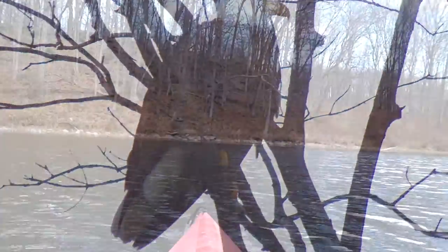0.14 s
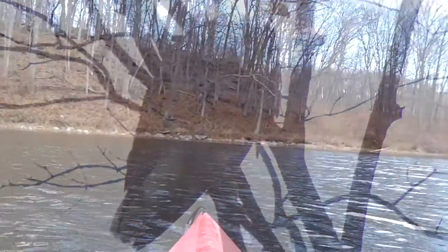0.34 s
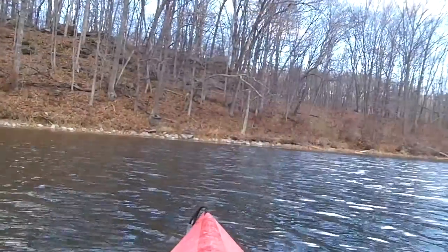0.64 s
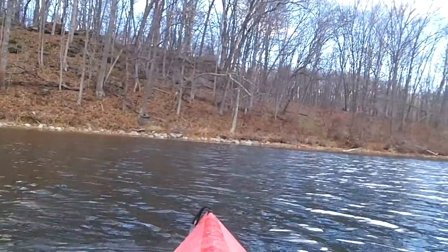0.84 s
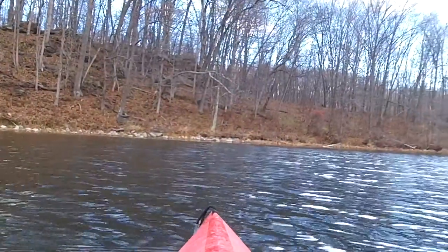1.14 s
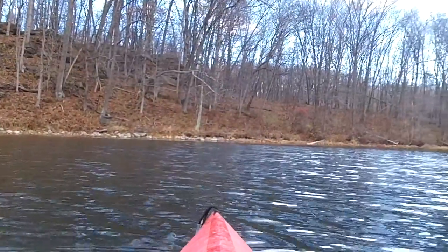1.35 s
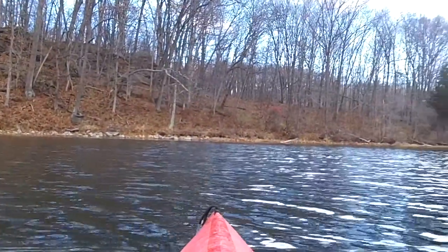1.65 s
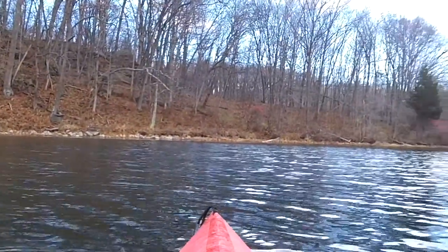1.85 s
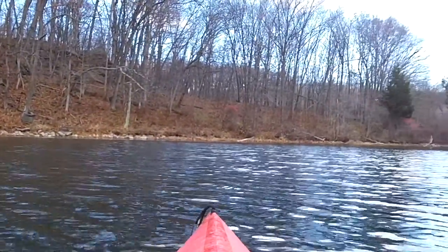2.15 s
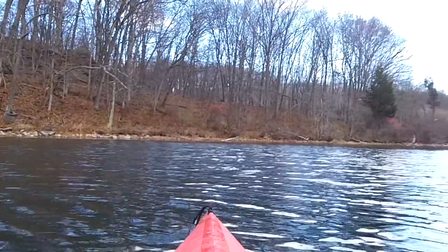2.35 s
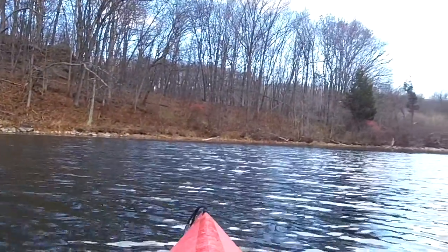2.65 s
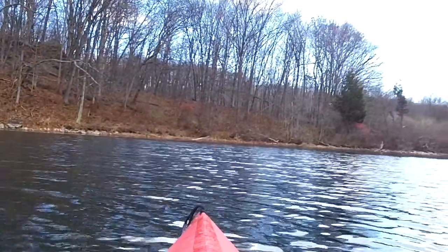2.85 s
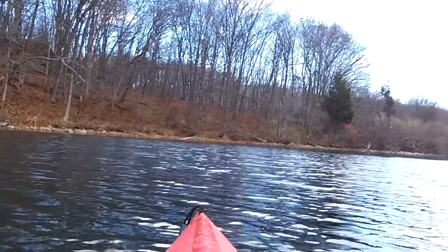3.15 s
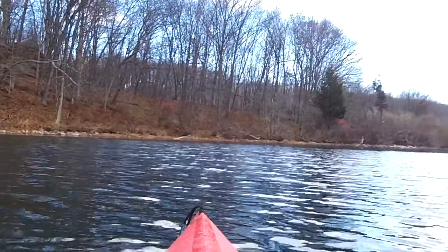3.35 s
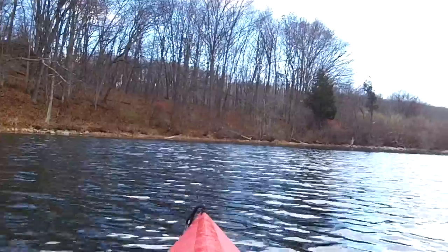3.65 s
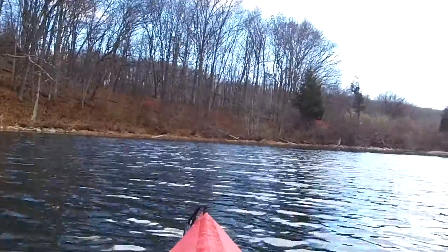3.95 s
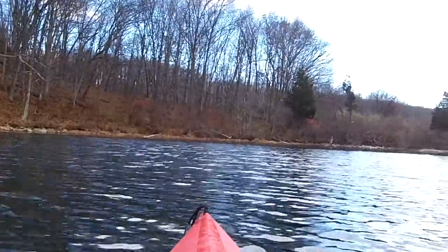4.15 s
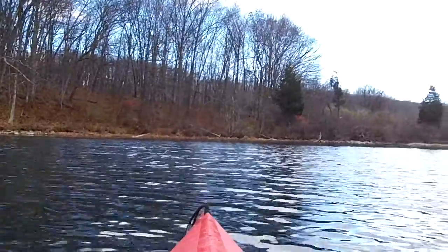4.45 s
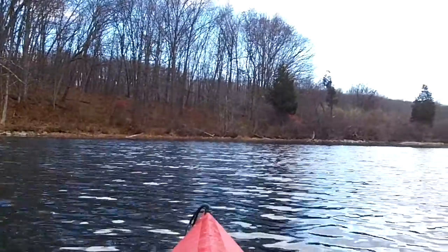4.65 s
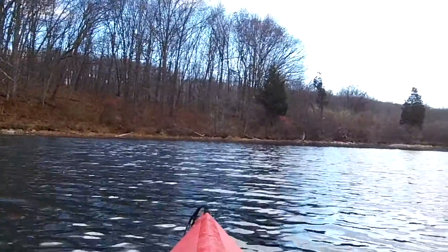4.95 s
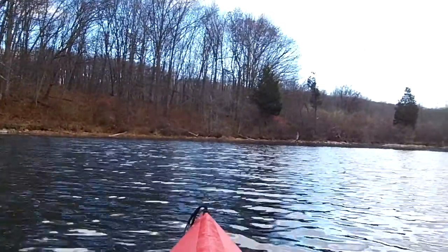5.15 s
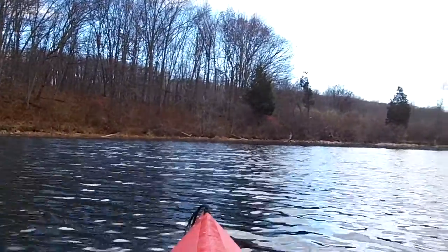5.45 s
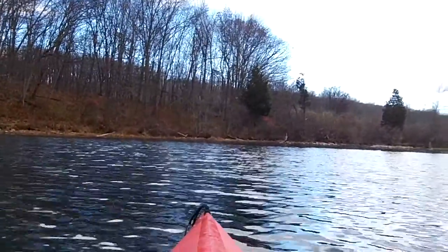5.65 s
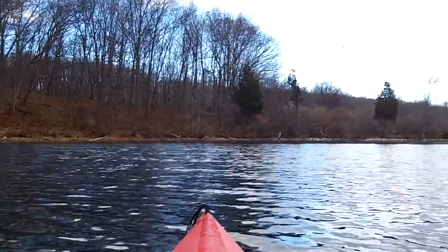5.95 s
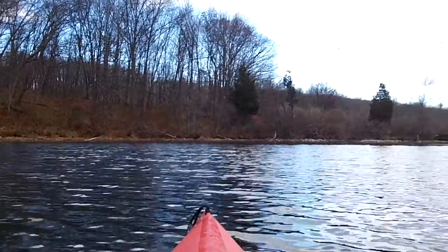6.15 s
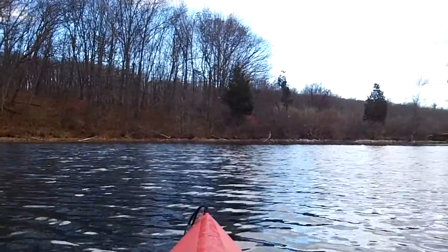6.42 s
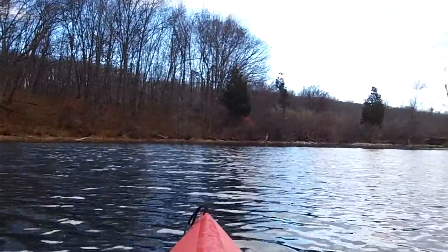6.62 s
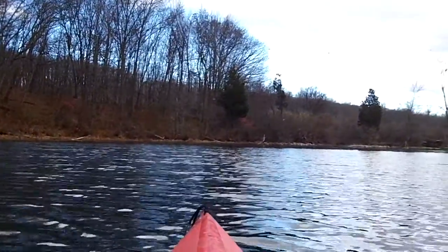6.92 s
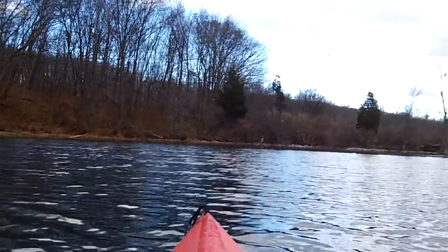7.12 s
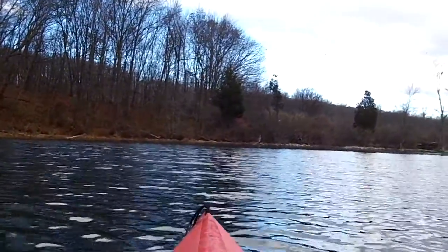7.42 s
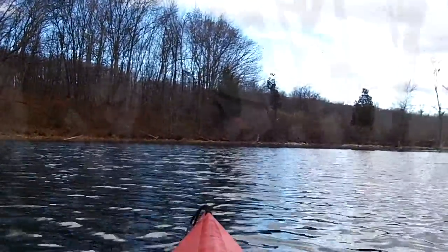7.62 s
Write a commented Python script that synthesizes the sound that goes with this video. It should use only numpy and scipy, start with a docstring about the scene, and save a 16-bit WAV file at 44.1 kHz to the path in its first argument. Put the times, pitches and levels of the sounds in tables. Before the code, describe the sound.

Close water splashes and gurgles at a small boat, then an eagle gives four rough-to-clear rising chirps across a lake, with faint peeps behind.

```python
"""An eagle on a wooded shore gives four two-part calls across a lake: a rough low voice leaps to a clean high one,
both built from partials weighted by the throat, and the bare trees send back a thin echo of filtered noise.
A fainter bird peeps far off in arched sine whistles; water splashes, gurgles and drips at a small boat as ringing
bubbles; wind touches the microphone as low noise and a hull boom, over a far rush of coloured noise."""
import sys
import numpy as np
from scipy import signal
from scipy.fft import rfft, irfft, next_fast_len
from scipy.io import wavfile

SR = 44100
rng = np.random.default_rng(int(sys.argv[2]) if len(sys.argv) > 2 else 0)


def volts_from_db(level):
    """Convert decibel levels to linear amplitude ratios."""
    exponent = np.asarray(level, float) / 20
    return 10 ** exponent


def transcribe(signal):
    """Save signal, clipped to [-1, 1], as a 16-bit WAV file at the path in sys.argv[1]."""
    frames = np.atleast_2d(signal).T
    limited = np.clip(frames, -1, 1)
    pcm = np.round(limited * 32767).astype(np.int16)
    wavfile.write(sys.argv[1], SR, pcm)


N = 343098

# water bubbling at the hull: t/s, level/dB
HULL_WATER = [(0, -87.5), (.28, -59), (.6, -57.5), (.68, -47), (.87, -41.5), (1.14, -44), (1.24, -53.5),
              (1.85, -60), (2.05, -51.5), (2.18, -60.5), (2.35, -52), (2.8, -61), (3.7, -65), (3.8, -50),
              (4.0, -65), (4.15, -54), (4.4, -56.5), (4.8, -64.5), (5.6, -70.5), (5.72, -57.5),
              (5.85, -71.5), (7.78, -83)]


def rms_one(x):
    """Normalisation: scales a signal to unit root-mean-square."""
    return x / np.sqrt(np.mean(x ** 2) + 1e-20)


def in_time(rows):
    """Linear interpolation: the columns of a curve table, one value a sample."""
    s, *columns = np.transpose(rows)
    return [np.interp(np.arange(N) / SR, s, c) for c in columns]


def band(x, low_hz, high_hz, order=2):
    """Band limitation by a Butterworth band-pass."""
    return signal.sosfilt(signal.butter(order, [low_hz, high_hz], "band", fs=SR, output="sos"), x)


def drift(rate_hz):
    """Slow random fluctuation of spread 1: white noise through a double-pole low-pass."""
    r = np.exp(-32 * np.pi * rate_hz / SR)   # drawn at every 16th sample
    noise = rng.standard_normal(N // 16 + 2002)
    slow = signal.lfilter([1], [1, -2 * r, r * r], noise)[2000:]
    return np.interp(np.arange(N) / 16, np.arange(len(slow)), rms_one(slow))


def air():
    """Broadband noise shaped by its spectrum: the far rush of water and of wind in trees."""
    # spectral colour of the rush: f/Hz, relative level per Hz/dB
    colour_points = np.array([(18, -18.5), (30, -1.5), (258, -6), (311, -6), (518, -7.5), (862, -6),
                              (1890, -10), (2330, -14), (2740, -15), (6460, -21), (7600, -8.5), (9880, -54),
                              (16700, -120)])
    # strength of the rush: t/s, level/dB
    rush = [(0, -55.5), (.5, -56), (2.0, -57), (3.3, -57.5), (4.8, -56.5), (6.05, -57.5), (6.3, -54.5),
            (6.6, -57), (7.78, -58)]
    size = next_fast_len(N)
    hz = np.fft.rfftfreq(size, 1 / SR) + 1   # kept above zero for the logarithm
    colour = volts_from_db(np.interp(np.log(hz), np.log(colour_points[:, 0]), colour_points[:, 1]))
    noise = irfft(rfft(rng.standard_normal(size)) * colour, size)[:N]
    return volts_from_db(in_time(rush)[0]) * rms_one(noise)


def wind():
    """Turbulent pressure on the microphone port, and cavity resonance of the hollow hull."""
    # gusts: centre t/s, half length/s, buffeting level/dB, hull boom level/dB
    gusts = [(0.403, 0.043, -62, -56), (0.573, 0.13, -57, -57.5), (1.105, 0.22, -63, -68),
             (3.935, .15, -75, -68.5), (4.78, 0.11, -78, -62), (5.044, 0.068, -54, -49.5),
             (5.134, 0.11, -71, -51), (5.43, 0.087, -61.5, -70), (5.851, 0.073, -66, -64)]
    buffet_db, boom_db = -70, -79.5   # between gusts
    lumpy_db, lumps_hz = 3, 5         # slow swing of these two levels
    now = np.arange(N) / SR
    buffet_gain = volts_from_db(buffet_db + lumpy_db * drift(lumps_hz))
    boom_gain = volts_from_db(boom_db + lumpy_db * drift(lumps_hz))
    for s, half_s, gust_buffet_db, gust_boom_db in gusts:
        swell = np.exp(-((now - s) / half_s) ** 2)
        buffet_gain = buffet_gain + volts_from_db(gust_buffet_db) * swell
        boom_gain = boom_gain + volts_from_db(gust_boom_db) * swell
    buffet = rms_one(band(rng.standard_normal(N), 18, 70, order=1))
    boom_phase = 2 * np.pi * np.cumsum(61.0 + 5.0 * drift(8)) / SR
    boom = np.sin(boom_phase) * volts_from_db(2.5 * drift(15))
    return buffet_gain * buffet + boom_gain * rms_one(boom)


def bubble(hz, t60, rise):
    """Resonance of trapped air: a faint tick of impact, then a decaying ring gliding by rise octaves per s."""
    t = np.arange(round(min(t60, .15, 1 / (abs(rise) + 1)) * SR) + 8) / SR
    ring = np.sin(2 * np.pi * np.cumsum(hz * 2 ** (rise * t)) / SR)
    swell = 1 - np.exp(-t / 0.00031)
    ending = np.clip((t[-1] - t) * 300, 0, 1)
    tick = 0.063 * np.exp(-t / 0.0016) * np.cos(2 * np.pi * 1.774 * hz * t)
    return ring * volts_from_db(-60 * t / t60) * swell * ending + tick


def wash():
    """Superposition of many small bubbles around one size, in clumps; louder water is also denser."""
    level_db = in_time(HULL_WATER)[0]
    per_s = 1600 * volts_from_db(.4 * (level_db + 45))   # before clumping
    draws, sizes, out = rng.random((N, 3)), rng.standard_normal(N), np.zeros(N + SR)
    for i in np.flatnonzero(draws[:, 0] < per_s * volts_from_db(4 * drift(20)) / SR):
        hz = np.clip(1700 * 2 ** (.62 * sizes[i]), 450, 6500)
        b = bubble(hz, (8 + 30 * draws[i, 1] ** 3) / hz, 40 * (draws[i, 1] - .3))
        # few are strong, and high ones are slightly weaker
        strength_db = -3.5 * np.log(draws[i, 2] + 0.0044) - 0.69 * np.log2(hz / 1000)
        out[i:i + len(b)] += b * volts_from_db(strength_db)
    return volts_from_db(level_db) * rms_one(out[:N] / np.sqrt(per_s))


def sprinkle():
    """Random arrivals of small stray drops of many sizes, more frequent while the water is stirred."""
    per_s, level_db = 51, -42.5     # at a hull water level of -50 dB
    middle_hz, spread_octaves = 2320, 0.81
    draws, sizes, out = rng.random((N, 2)), rng.standard_normal((N, 2)), np.zeros(N + SR)
    stirred_db = in_time(HULL_WATER)[0] + 50
    for i in np.flatnonzero(draws[:, 0] < per_s * volts_from_db(1.3 * stirred_db) / SR):
        hz = np.clip(middle_hz * 2 ** (spread_octaves * sizes[i, 0]), 400, 6800)
        b = bubble(hz, (12 + 25 * draws[i, 1] ** 2) / hz, 9.4 * sizes[i, 1])
        # stronger drops also glide upward faster
        out[i:i + len(b)] += volts_from_db(level_db + 0.21 * stirred_db[i] + 2.7 * sizes[i, 1]) * b
    return out[:N]


def drops():
    """Resonance of single drops and bubbles that stand out, each throwing four smaller ones after it."""
    # single drops: t/s, peak level/dB, f/Hz, t60/s (at least .004 is used), pitch rise/(octaves per s)
    single_drops = [(.031, -44, 5500, .01, 0), (.094, -47, 6000, .006, 0), (.209, -47, 5500, .005, 0),
                    (.288, -47, 6120, .006, 0), (.174, -45.5, 4160, 0.0088, 20),
                    (.268, -39, 4270, 0.0032, 0), (0.289, -38.5, 1350, 0.048, 6),
                    (.334, -42.5, 2770, .019, 7), (0.545, -32.5, 4000, 0.0056, 0),
                    (.544, -42, 5600, .016, 10), (0.562, -36, 4500, 0.0036, 0),
                    (.563, -25.5, 7050, .005, 0), (.653, -44, 2540, .015, 3),
                    (.676, -36.5, 1040, 0.046, -26), (.705, -32, 1160, 0.046, -2),
                    (.725, -29, 904, 0.024, 0), (.73, -30.5, 1750, .013, 4), (0.763, -34, 775, .016, 0),
                    (.762, -24.5, 2600, 0.011, 0), (0.763, -36, 3600, .0097, 0), (.793, -45, 5870, .007, 0),
                    (.812, -39, 1202, 0.19, -11), (.912, -46, 6160, .006, 0),
                    (.968, -42.5, 4550, 0.0076, 0), (1.061, -39, 4300, .004, 0), (1.096, -38, 2500, .02, 2),
                    (1.11, -37.5, 1600, .039, -1), (1.129, -49, 6060, .006, 0),
                    (1.195, -44, 1050, .058, -6), (3.474, -47, 4500, .008, 0), (4.245, -40, 4505, .004, -2),
                    (0.778, -35, 1490, .021, -6), (.844, -26, 1320, 0.018, -3),
                    (0.851, -30, 2020, 0.025, 1), (.86, -24, 1400, 0.0063, -11),
                    (0.866, -28.5, 2410, 0.03, 0), (.915, -30.5, 2650, 0.015, -1),
                    (0.929, -19, 1310, 0.0076, 12), (.951, -27, 1750, .017, 0),
                    (0.967, -36, 1380, 0.024, -4), (.998, -36, 2270, 0.066, -4.5),
                    (1.014, -19, 1770, .013, -12), (1.052, -32, 2420, 0.012, 0),
                    (1.062, -34, 1640, .0087, 0), (1.13, -35.5, 3440, 0.0049, 0),
                    (1.146, -39, 996, 0.091, -2), (1.17, -33.5, 2360, .029, -6),
                    (1.247, -34.5, 1100, 0.035, 2), (1.29, -43, 1185, 0.088, -18.5),
                    (1.395, -39, 778, 0.092, -25), (1.42, -44.5, 740, 0.28, .6),
                    (1.428, -34.5, 2560, 0.0069, 2), (1.455, -30, 1500, 0.0041, -2),
                    (1.517, -36.5, 1590, 0.015, 0), (1.552, -34.5, 2320, 0.021, 9),
                    (1.691, -37, 1500, .039, 0.5), (1.753, -40, 1120, 0.028, 6),
                    (1.873, -42.5, 550, 0.029, 37), (1.904, -40, 2100, 0.014, 2),
                    (1.925, -31.5, 1140, 0.019, -11), (1.994, -30.5, 1500, 0.0051, 2),
                    (2.017, -42, 864, 0.078, 47), (2.063, -39.5, 1170, 0.022, 9),
                    (2.264, -40.5, 2630, 0.0045, -2), (2.306, -39, 1460, .017, 0),
                    (2.342, -33, 2000, 0.011, 11), (2.342, -41.5, 3740, 0.014, 29),
                    (2.35, -40, 1210, 0.034, -17), (2.405, -37.5, 1284, 0.031, 3),
                    (2.408, -38.5, 2460, .044, -39), (2.474, -41.5, 1735, .086, 8),
                    (2.495, -37, 2230, .019, -4), (2.51, -31.5, 1800, 0.022, -18),
                    (3.487, -34, 1960, 0.01, -10), (3.776, -27.5, 2310, 0.0078, -6),
                    (3.778, -35.5, 1230, .031, -29), (3.792, -33.5, 987, 0.054, 2),
                    (3.984, -45, 997, .069, 17), (4.023, -33.5, 1796, 0.0078, 0),
                    (4.023, -33.5, 2760, 0.016, 10), (4.091, -23, 2000, .024, 5),
                    (4.126, -35.5, 1117, 0.029, 38), (4.156, -27, 1390, 0.014, -6),
                    (4.178, -38, 2190, 0.015, -13), (4.228, -36, 3130, .0092, 0),
                    (4.238, -34.5, 2290, 0.0093, 4), (4.267, -33, 2500, 0.013, -6),
                    (4.303, -29, 891, .077, 5.5), (4.64, -39, 2950, 0.0034, 0),
                    (4.692, -25, 1846, 0.039, -12), (4.823, -37.5, 916, 0.066, 47),
                    (5.224, -43.5, 1111, 0.072, -3), (5.7, -46, 482, .039, -5), (5.684, -43.5, 393, .01, 0),
                    (5.761, -46, 200, .026, 6), (5.762, -34, 1723, 0.0039, -2),
                    (5.761, -34.5, 580, 0.01, -15), (6.001, -48.5, 3700, .012, -16),
                    (7.194, -46.5, 2385, 0.042, -1)]
    out, spray = np.zeros(N + SR), rng.standard_normal((len(single_drops), 4, 3))
    for (s, db, hz, t60, rise), around in zip(single_drops, spray):
        b, i = bubble(hz, max(t60, .004), rise), round(s * SR)
        out[i:i + len(b)] += volts_from_db(db) * b / np.max(np.abs(b))
        for late, size, strength in around:
            b = bubble(hz * 2 ** (0.21 + 0.483 * size), 22.7 / hz, 20.0)
            j = i + round(0.0088 * abs(late) * SR)
            out[j:j + len(b)] += volts_from_db(db - 13 + 4.0 * strength) * b
    return out[:N]


def far_bird():
    """Frequency modulation: each whistle arches up to its top and down, wavering over the distance."""
    # arched whistles: t/s at the top, top f/Hz, level/dB
    peeps = [(0.374, 1632, -48), (1.405, 1640, -48.5), (1.818, 1600, -46), (2.256, 1582, -46),
             (2.634, 1580, -50.5), (3.449, 1590, -52), (3.92, 1607, -49.5)]
    out, u = np.zeros(N), np.linspace(-1, 1, round(.076 * SR))
    for s, hz, db in peeps:
        i = round(s * SR) - len(u) // 2
        phase = np.cumsum(hz * (1 - 0.24 * u ** 2)) * 2 * np.pi / SR
        out[i:i + len(u)] += volts_from_db(db) * np.sqrt(2) * (1 - u ** 4) * np.sin(phase)
    return out * volts_from_db(2.5 * drift(40))


def shore(x):
    """Scattering off many trunks: a dense tail of echoes whose treble dies first."""
    t60_s, treble_t60_s, level_db = 1.39, 0.85, -23.5
    t, scatter = np.arange(SR) / SR, rng.standard_normal(SR)
    tail = band(scatter, 1080, 4120) * volts_from_db(-60 * t / t60_s)
    tail += 0.72 * band(scatter, 4040, 4800) * volts_from_db(-60 * t / treble_t60_s)
    tail *= np.clip(t / 0.02, 0, 1)
    return volts_from_db(level_db) * signal.oaconvolve(x, tail / np.sqrt(np.sum(tail ** 2)))[:N]


def throat(hz):
    """Resonant filtering: gain of throat and beak at a frequency."""
    # throat and beak: f/Hz, level/dB
    points = np.array([(600, -20), (1250, -18), (1400, -12.5), (1600, -2), (2000, -0.5), (2500, -3.5),
                       (2780, 0.5), (2950, -4.5), (3090, -14), (3250, 1), (3900, -9), (4200, -2),
                       (4800, -5), (5500, -8.5), (6200, -12), (7500, -18.5)])
    return volts_from_db(np.interp(np.log(hz), np.log(points[:, 0]), points[:, 1]))


def voice(calls, partials_db):
    """Source and filter: pitch, phase, effort and throat-coloured partial heights of one side of the syrinx."""
    hz, effort_db, bright_db = in_time(np.concatenate(calls))
    edges = []   # silent outside the calls
    for c in calls:
        first, last = c[0][0], c[-1][0]
        edges += [(first - .006, 0), (first, 1), (last, 1), (last + 0.029, 0)]
    phase = 2 * np.pi * np.cumsum(hz * (1 + 0.0013 * drift(60))) / SR
    effort = np.sqrt(2) * volts_from_db(effort_db) * in_time(edges)[0]
    partials = [effort * volts_from_db(db + k * bright_db) * throat((k + 1) * hz) for k, db in enumerate(partials_db)]
    return hz, phase, effort, partials


def low_voice():
    """Period doubling: partials of a rasping voice, with half-pitch lines between them."""
    # one curve a call: t/s, pitch f/Hz, effort level/dB, brightness/(dB per partial)
    low_calls = [
        [(2.695, 1180, -51, 0.5), (2.715, 1217, -38, 2), (2.727, 1270, -34, -5), (2.743, 1250, -36.5, 1.5),
         (2.786, 1320, -32, -0.8), (2.829, 1349, -37.5, 2.2), (2.872, 1427, -30.5, -3),
         (2.905, 1398, -35, -10.5), (2.93, 1520, -48.5, 2)],
        [(3.5, 1190, -44, 1.5), (3.518, 1306, -29, 0.5), (3.53, 1394, -31.5, -0.5), (3.542, 1347, -32.5, 2.5),
         (3.575, 1378, -32.5, 1.2), (3.626, 1417, -29, .1), (3.68, 1498, -30.5, 1.9), (3.71, 1549, -31, 1.5),
         (3.723, 1496, -31.5, -2), (3.735, 1460, -53, -1)],
        [(4.278, 1258, -38.5, 0.5), (4.294, 1364, -31, 1.2), (4.305, 1450, -24.5, -1), (4.318, 1391, -31.5, 0),
         (4.348, 1443, -28, -0.3), (4.39, 1500, -30, 1.3), (4.44, 1541, -31, 0.3), (4.493, 1602, -29, -2.5),
         (4.502, 1500, -36.5, -4), (4.512, 1550, -60, -1)],
        [(5.145, 1198, -50, -5), (5.172, 1335, -32, -1), (5.192, 1367, -32, -2.5), (5.215, 1351, -33, -0.7),
         (5.268, 1416, -30.5, -1.9), (5.31, 1460, -29.5, -0.2), (5.348, 1532, -32, 0), (5.36, 1448, -34, -1),
         (5.372, 1510, -49, -3)],
    ]
    # partials 1, 2, 3 ..: level/dB
    low_partials_db = [-0.6, 0.16, -11.5, -17.5, -23.5]
    # lines at 1/2, 3/2, 5/2 .. of the pitch, before hoarseness: level/dB at the onset
    half_onset_db = [-15.5, -1.5, -13, -16, -21.5, -21.5]
    # the same lines once the voice has settled: level/dB
    half_settled_db = [-36.5, -32.5, -24.5, -26.5, -27.5, -30]
    # added strength of the half-pitch lines, call by call: level/dB
    hoarseness_db = [.1, .1, .1, 2.7]
    # the voice catches once soon after its onset: t/s, depth/dB
    catches = [(2.733, 3.5), (3.527, 12.5), (4.305, 21), (5.178, 3)]
    catch_s, settle_s, catch_hoarse = 0.0029, 0.019, 0.56   # catch_hoarse: share of the onset's roughness

    low_hz, low, effort, partials = voice(low_calls, low_partials_db)
    starts, now = np.array([c[0][0] for c in low_calls]), np.arange(N) / SR
    call = np.maximum(np.searchsorted(starts, now) - 1, 0)
    age, hoarse_db = now - starts[call], np.array(hoarseness_db)[call]
    # half-pitch lines fade as the onset settles and come back, in part, around the catch
    around_catch = sum(np.exp(-((now - s) / settle_s) ** 2) for s, _ in catches)
    unsettled = np.maximum(np.exp(-(age / settle_s) ** 2), catch_hoarse * around_catch)
    caught = volts_from_db(-sum(db * np.exp(-((now - s) / catch_s) ** 2) for s, db in catches))

    out = np.zeros(N)
    for k, height in enumerate(partials):
        out += caught * height * volts_from_db((0.7 + 0.75 * k) * drift(30)) * np.sin((k + 1) * low)
    # strong and weak cycles alternate, unsteadily
    for k, (onset_db, settled_db) in enumerate(zip(half_onset_db, half_settled_db)):
        line_db = settled_db + hoarse_db + (onset_db - settled_db) * unsettled
        half = effort * volts_from_db(line_db) * throat((k + 1 / 2) * low_hz)
        half = half * volts_from_db(2.7 * drift(25)) * volts_from_db(3 * drift(120))
        out += half * np.sin((k + 1 / 2) * low)
    rasp = volts_from_db(0.81 * drift(40) + 0.64 * drift(250))
    return out * rasp, low, partials


def high_call(start, hold_end, start_hz, top_hz, db, bright_db, brighten_s, swell_db):
    """Glide and envelope: a quick dull entry, a hold that creeps upward, a sagging close."""
    attack_s, entry_db = .010, -3
    round_s, round_hz = 0.00983, 35   # the top rounds over before the fall
    # the pitch sags, the level holds to the knee, then drops
    fall_s, fall_hz, fall_db, knee_share = 0.033, 290, -20.5, .52
    entry_dull_db, knee_dull_db, end_dull_db = 8, 2, 12   # per partial: weak effort is dull
    entry = start + attack_s
    bright_hz = np.interp(start + brighten_s, [entry, hold_end], [start_hz, top_hz])
    held_db = db + swell_db
    return [(start, start_hz, db - 52, bright_db),
            (entry, start_hz, db + entry_db, bright_db - entry_dull_db),
            (start + brighten_s, bright_hz, db, bright_db),
            (hold_end, top_hz, held_db, bright_db),
            (hold_end + round_s, top_hz - round_hz, held_db + 0.5, bright_db - 1.0),
            (hold_end + knee_share * fall_s, top_hz - knee_share * fall_hz, held_db, bright_db - knee_dull_db),
            (hold_end + fall_s, top_hz - fall_hz, db + fall_db, bright_db - end_dull_db)]


def high_voice():
    """Harmonic synthesis: three partials of a clean voice."""
    # calls: start t/s, end of hold t/s, start f/Hz, top f/Hz, level/dB, brightness/(dB per partial),
    # time to brighten/s
    high_calls = [(2.874, 3.069, 1914, 2035, -32, -1, 0.043), (3.71, 3.854, 2055, 2113, -27, -0.1, 0.027),
                  (4.491, 4.54, 2111, 2134, -27, -2.2, .022), (5.346, 5.564, 2033, 2088, -30.5, 1.5, .028)]
    # change over the hold, call by call: level/dB
    hold_swell_db = [-0.26, -1.2, -0.42, -1.5]
    # partials 1, 2, 3: level/dB
    high_partials_db = [0.16, -0.5, -6]
    calls = [high_call(*row, swell_db) for row, swell_db in zip(high_calls, hold_swell_db)]
    _, high, _, (b1, b2, b3) = voice(calls, high_partials_db)
    out = b1 * volts_from_db(.7 * drift(15)) * np.sin(high)
    out += b2 * volts_from_db(drift(20)) * np.sin(2 * high)
    out += b3 * volts_from_db(drift(20)) * np.sin(3 * high)
    return out, high, b1


def combination_tones(low, high, a1, b1):
    """Intermodulation: while both voices sound, each modulates the other's air stream."""
    both = np.sqrt(a1 * b1) * np.clip(a1 / volts_from_db(-40), 0, 1)
    out = both * (volts_from_db(5.0) * np.sin(low + high) + volts_from_db(1.5) * np.sin(2 * high - low))
    return out + both * (volts_from_db(-12) * np.sin(2 * low + high) + volts_from_db(-12) * np.sin(low + 2 * high))


def squeaks():
    """Transient falling tones: the low voice catches once more as a call closes."""
    # squeaks: t/s, start f/Hz, level/dB
    closing_catches = [(3.09, 2720, -33), (3.881, 2660, -31.5), (4.569, 2665, -32.5), (5.59, 2740, -28.5)]
    out, t = np.zeros(N), np.arange(SR // 30) / SR
    shape = (1 - np.exp(-t / .0015)) * np.exp(-(t / .009) ** 2)
    for s, hz, db in closing_catches:
        fall = np.cumsum(hz * (1 - 13.0 * t)) * 2 * np.pi / SR
        tone = np.sin(fall) + 0.3 * np.sin(fall * 3 / 2) + .1 * np.sin(fall / 2)
        i = round(s * SR)
        out[i:i + len(t)] += volts_from_db(db) * shape * tone
    return out


def eagle():
    """Two-sided syrinx: a low voice leaps to a high one, with combination tones and turbulent breath."""
    low_sound, low, partials = low_voice()
    high_sound, high, b1 = high_voice()
    a1, a2 = partials[:2]
    breath = rms_one(band(rng.standard_normal(N), 2200, 5600))   # turbulent air in the throat
    breath = breath * (volts_from_db(-30) * a2 + volts_from_db(-36) * b1)
    return low_sound + high_sound + combination_tones(low, high, a1, b1) + squeaks() + breath


def scene():
    """Superposition: birds across the water with their echo, the lake close by."""
    birds = eagle() + far_bird()
    return (birds + shore(birds) + drops() + sprinkle() + wash() + air() + wind())[None]


def top_cut(x):
    """Nothing passes above the cut-off."""
    return signal.sosfilt(signal.butter(12, 15750, fs=SR, output="sos"), x)


def record(dry):
    """Band limitation: the microphone path ends near 7 kHz; a faint steady hiss lies above, from about
    8.7 to 15 kHz; the sound fades in."""
    # fade-in: t/s, level/dB
    fade_in = [(0, -17), (.2, -7), (.45, -3.5), (.6, 0.5)]
    heard = signal.sosfilt(signal.cheby2(10, 45, 7700, fs=SR, output="sos"), dry)
    hiss = volts_from_db(-68) * rms_one(band(rng.standard_normal(N), 8740, 15130, order=6))   # level before the fade
    mix = (heard + hiss) * volts_from_db(in_time(fade_in)[0])
    return top_cut(mix)


dry = scene()
out = record(dry)
transcribe(out)
```